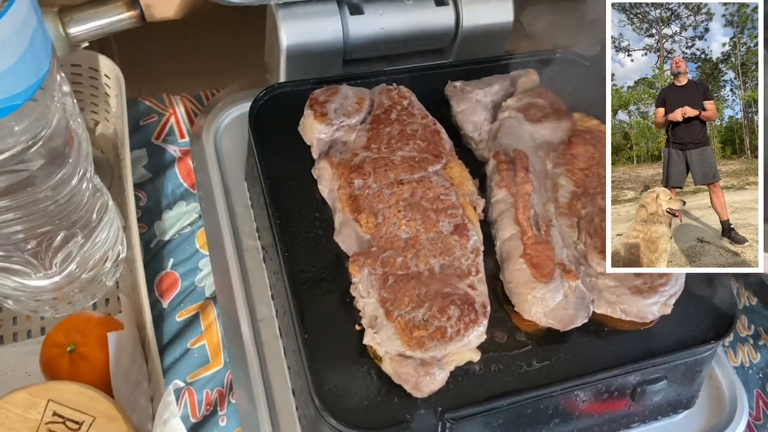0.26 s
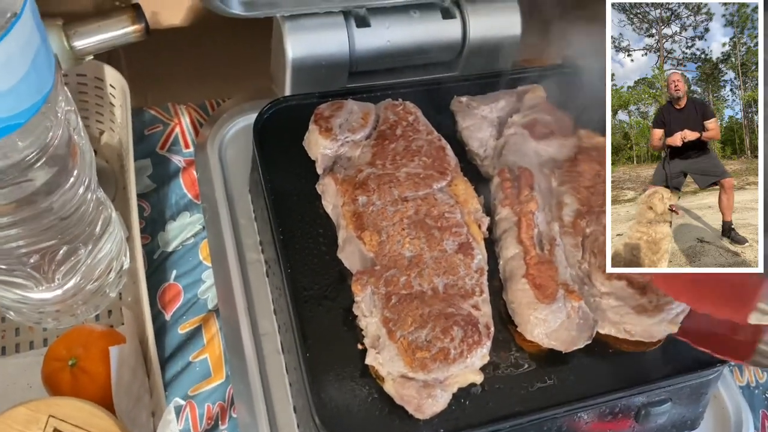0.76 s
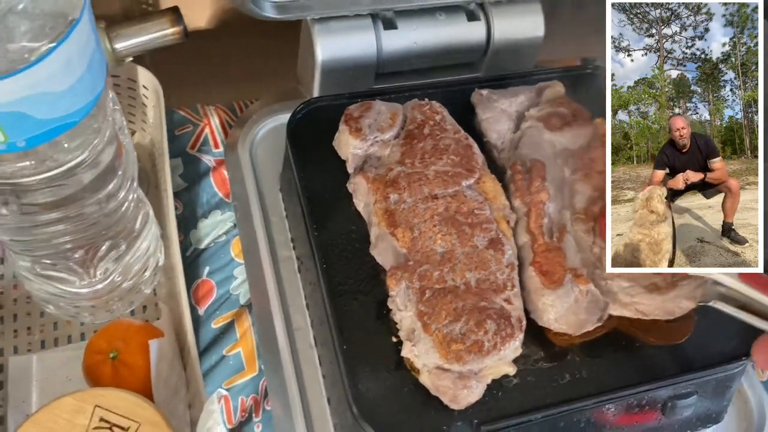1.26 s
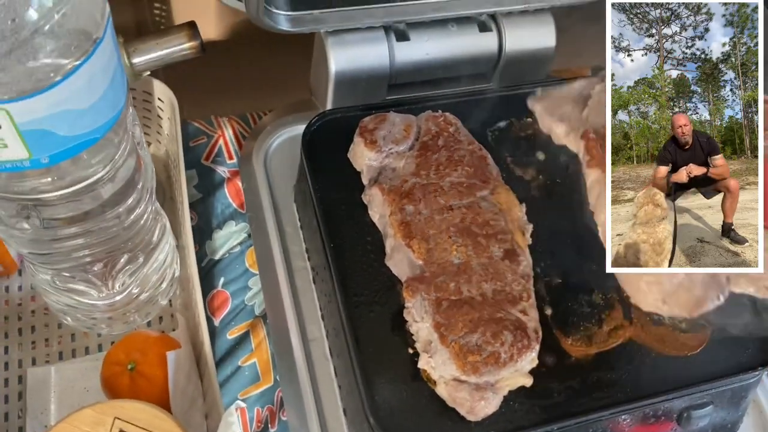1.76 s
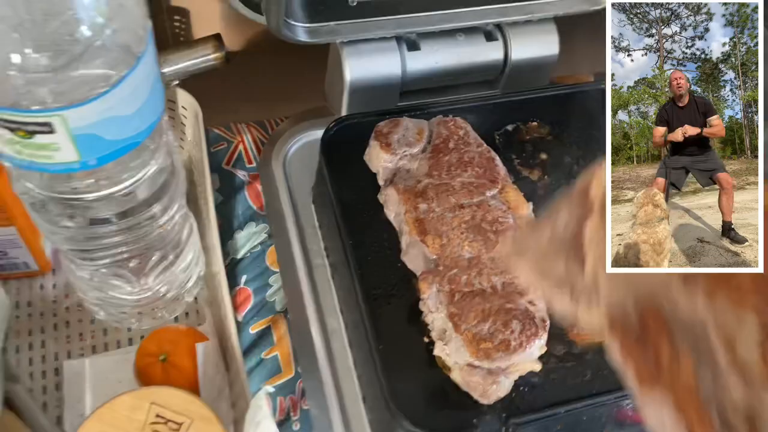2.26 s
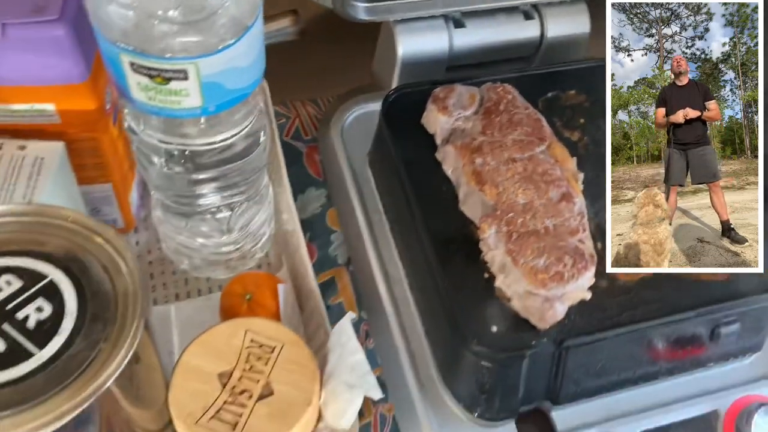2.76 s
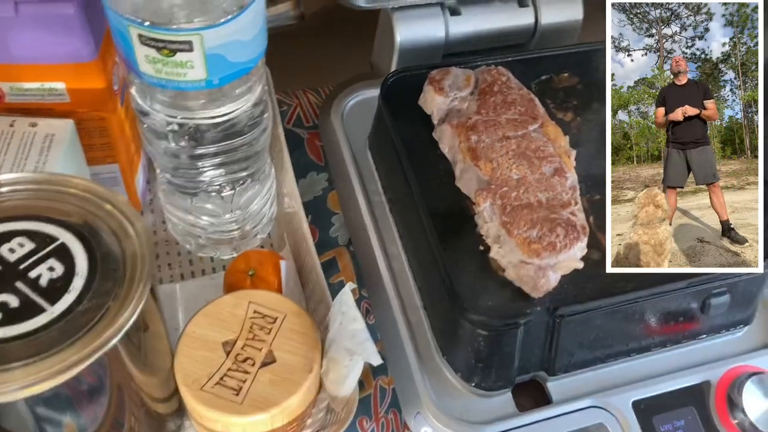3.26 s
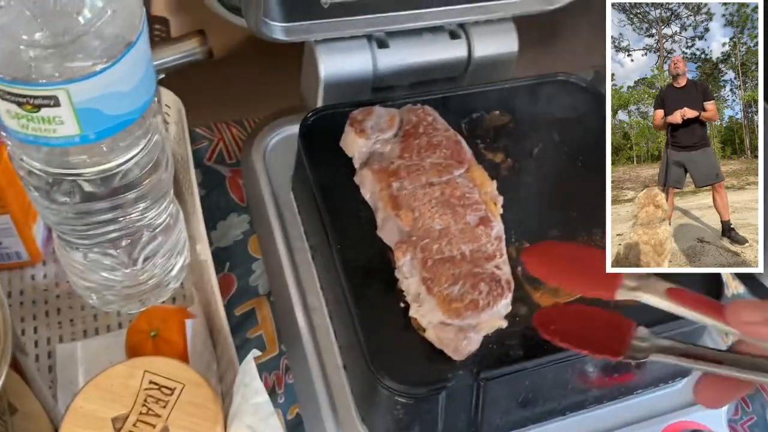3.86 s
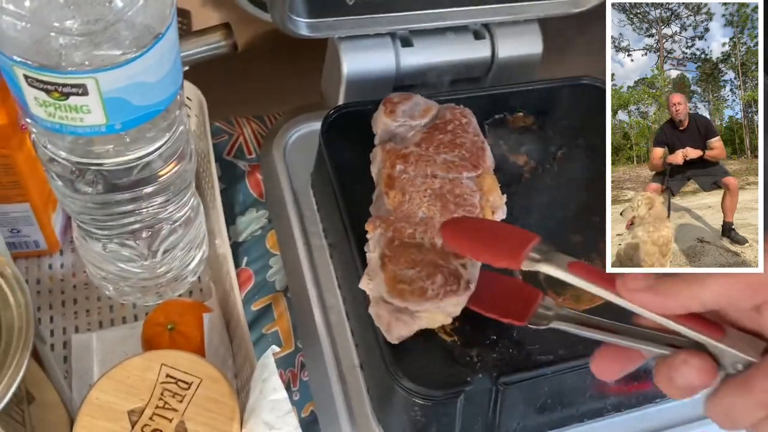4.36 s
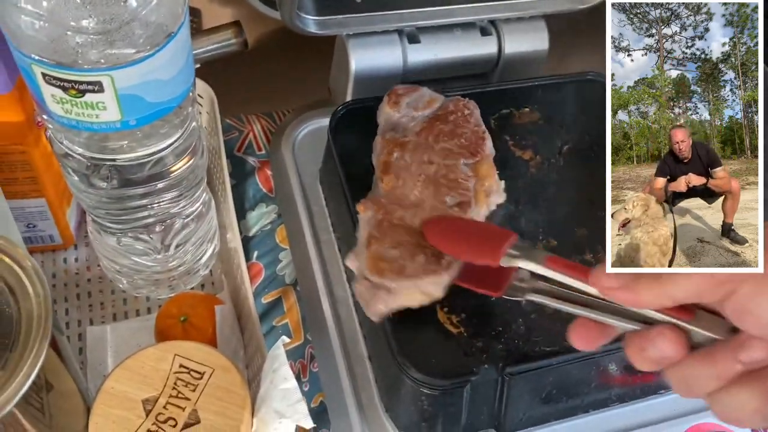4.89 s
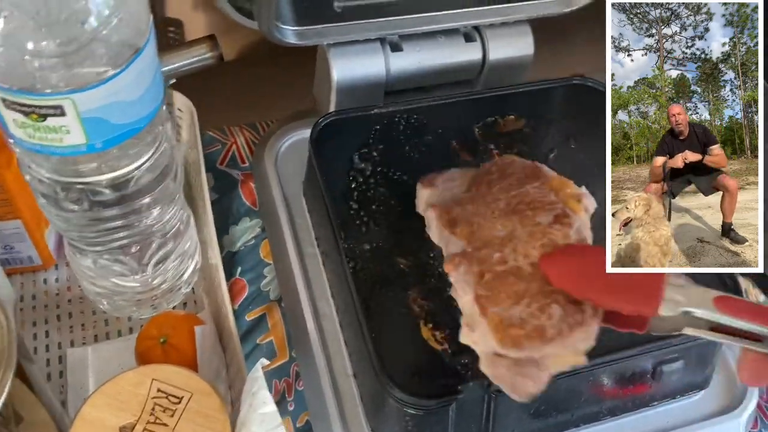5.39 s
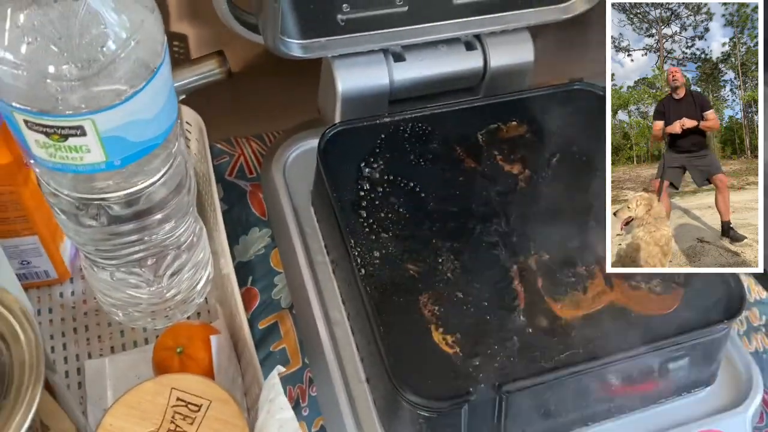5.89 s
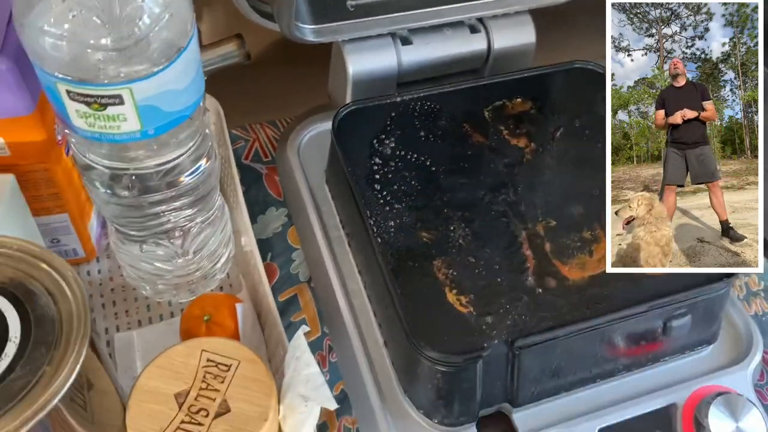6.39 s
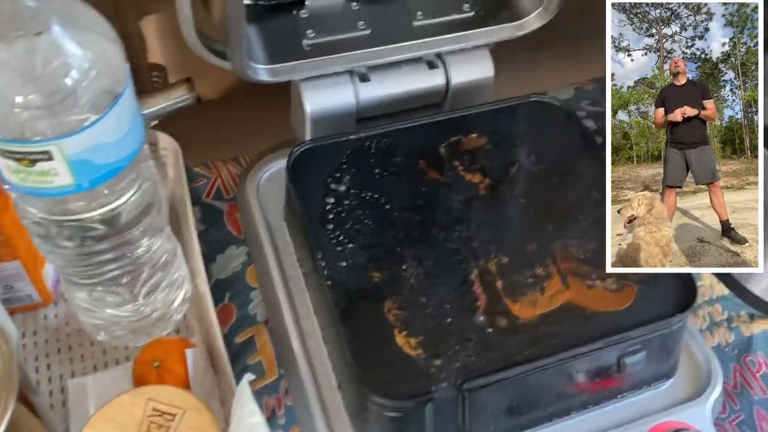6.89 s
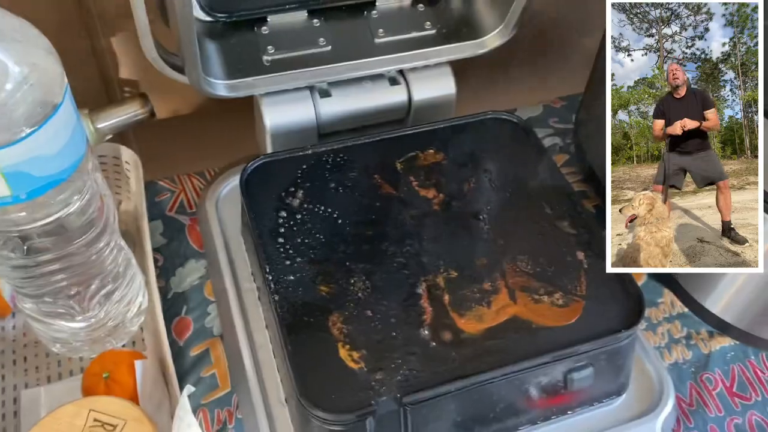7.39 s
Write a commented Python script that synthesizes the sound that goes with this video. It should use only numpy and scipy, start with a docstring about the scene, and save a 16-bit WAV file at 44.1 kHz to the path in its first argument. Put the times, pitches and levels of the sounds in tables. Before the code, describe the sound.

Steaks sizzle and spit close up on a hot grill plate, the hiss dying down to scattered pops as they are lifted off.

```python
"""Steaks on an electric grill

Two steaks sizzle close to a hand-held microphone and are lifted off with soft tongs. Countless tiny
steam bubbles burst, more when the meat is pressed or dragged; on the bare plate the last fat thins to
single spits and high squeaks. The lid and kitchen answer briefly, and an appliance hums underneath."""
import sys
import numpy as np
from scipy import signal
from scipy.fft import rfft, irfft, next_fast_len
from scipy.io import wavfile
from scipy.ndimage import map_coordinates

SR = 44100
rng = np.random.default_rng(int(sys.argv[2]) if len(sys.argv) > 2 else 0)


def dump(signal):
    """Clip the signal to [-1, 1] and save it as 16-bit WAV at the path in sys.argv[1]."""
    limited = np.clip(np.atleast_2d(signal).T, -1, 1)
    pcm = np.round(limited * 32767).astype(np.int16)
    wavfile.write(sys.argv[1], SR, pcm)


N = 336914


def amp(db):
    return 10 ** (np.asarray(db) / 20)


def unit(x):
    return x / np.sqrt(np.mean(x ** 2) + 1e-20)


def along(points, hz):
    """Read a curve of (freq_hz, value) points on a log frequency axis."""
    freqs, values = np.transpose(points)
    return np.interp(np.log(hz + 1), np.log(freqs + 1), values)


def wobble(rate):
    """A smooth random curve with `rate` knots a second."""
    return map_coordinates(rng.standard_normal(int(N * rate / SR) + 4), [np.arange(N) * rate / SR])


def filtered(x, response):
    """Pass x through a complex frequency response."""
    size = next_fast_len(N + SR // 2, real=True)
    return irfft(rfft(x, size) * response(np.fft.rfftfreq(size, 1 / SR)), size)[:N]


def noise(colour):
    """Noise of rms 1 with the given colour."""
    return unit(filtered(rng.standard_normal(N), lambda hz: amp(along(colour, hz))))


def snap(gain, size=2048):
    """The sharpest causal click that has the given gain over frequency."""
    cepstrum = irfft(np.log(np.maximum(gain(np.fft.rfftfreq(size, 1 / SR)), 1e-6)))
    cepstrum[1:size // 2] *= 2
    cepstrum[size // 2 + 1:] = 0
    return irfft(np.exp(rfft(cepstrum)))


def add(track, start_s, sound):
    """Mix a sound into a track."""
    start = int(np.clip(round(start_s * SR), 0, N))
    track[start:start + len(sound)] += sound[:N - start]


def bubble_bands(hz, edges_hz=(2100, 4600, 8000), order=16):
    """Crossover gains for big, middling, small and tiny bubbles, from low to high."""
    below = [0 * hz] + [1 / (1 + (hz / edge) ** order) for edge in edges_hz] + [0 * hz + 1]
    return np.abs(np.diff(below, axis=0))


ONE_STEAK_DB = -43  # the sizzle's reference level
# The undisturbed sizzle: two steaks, one from 1.5 s, then the bare plate drying: time_s, level_db
SIZZLE_ARC = [(0, -35.5), (.12, -36.5), (.55, -37), (.72, -37), (1.3, -36), (1.56, -42.5), (2.25, -43.6),
              (2.55, -42), (3.15, -43.5), (4, -44), (5.25, -44.5), (5.7, -51), (5.94, -55.5), (6.07, -52.5),
              (6.32, -59), (6.8, -59.5), (6.93, -66), (7.64, -65)]
# Boosts as the meat is pressed or dragged: start_s, length_s, wet_db, boil_db, spray_db
MEAT_PRESSES = [(0.818, 0.21, 5, 5, 3), (1.044, 0.22, 4.5, 4.5, 4.5), (1.57, 0.1, 4.5, .5, 3.8),
                (1.727, 0.38, 3, 0.5, 0.86), (4.115, 0.29, 3.5, 3.5, 3.5), (4.37, 0.13, 0.5, 4.8, 1.3),
                (4.52, .2, 1, 3.7, 0), (4.723, 0.31, 3, 5.5, 1.9), (5.047, 0.39, 1.5, 0, 0)]


def frying_effort(ramp_s=0.1):
    """Vigour in dB against one steak, and boosts as presses boil out juice and put fat on hot metal."""
    t, boosts_db = np.arange(N) / SR, np.zeros((3, N))
    for start_s, length_s, *gains_db in MEAT_PRESSES:
        force = np.clip((t - start_s) / ramp_s, 0, 1) - np.clip((t - start_s - length_s) / ramp_s, 0, 1)
        boosts_db += np.outer(gains_db, force)
    vigour_db = np.interp(t, *np.transpose(SIZZLE_ARC)) - ONE_STEAK_DB
    return vigour_db, *boosts_db


# Tone of fat bursting on the plate: freq_hz, gain_db
FAT_COLOUR = [(250, -39.5), (690, -26.5), (850, -13), (1250, -4), (2100, -2), (3400, 1), (4000, -2),
              (4500, -12.5), (4850, -14), (6400, -3), (8000, -15.5), (11000, -19), (12800, -27),
              (15800, -30)]
# Mix of big, middling, small and tiny bubbles: trim_db, follow (dB per dB of vigour)
BUBBLE_MIX = [(-9.5, 0.88), (-1.5, 1), (-4, 0.89), (-11.5, 0.77)]


def sizzle(clump_db=0.08, flutter_db=0.3, balance_db=1.5, drift_db=0.3, mist=0.71, mist_s=0.0025):
    """Unequal bubbles burst at random, in clumps; wet meat adds big ones, hot fat a fine spray."""
    vigour_db, wet_db, boil_db, spray_db = frying_effort()
    # a quieter sizzle has fewer bursts, of more unequal size
    bursts_per_s = np.minimum(600 + 9000 * amp(1.4 * (vigour_db + boil_db)), 14000)
    spread_db = 5 - 0.0166 * vigour_db
    chance = bursts_per_s / SR
    sizes = amp(spread_db * np.minimum(rng.standard_normal(N), 2.3)) * rng.choice([-1, 1], N)
    bursts = (rng.random(N) < chance) * sizes / np.sqrt(chance)
    # the last fat on the drying plate comes in bouts
    bouts_db = 0.076 * np.maximum(-vigour_db, 0)
    bursts *= amp(clump_db * wobble(110) + (flutter_db + bouts_db) * wobble(22))
    # each burst throws off a brief mist of finer droplets
    lingering = signal.lfilter([1], [1, -np.exp(-1 / (mist_s * SR))], bursts ** 2)
    droplets = unit(np.sqrt(lingering) * rng.standard_normal(N))
    fat_click = snap(lambda hz: amp(along(FAT_COLOUR, hz)))
    pressed_db = [wet_db, boil_db, spray_db, spray_db]
    out = np.zeros(N)
    for band, (trim_db, follow) in enumerate(BUBBLE_MIX):
        # each bubble has its own balance of low and high; the mist is mostly treble
        balance = amp(balance_db * rng.uniform(-0.81, 1, N) + drift_db * wobble(6.4))
        mist_share = mist * (band / (len(BUBBLE_MIX) - 1)) ** 2
        pulses = np.sqrt(1 - mist_share) * unit(bursts * balance) + np.sqrt(mist_share) * droplets
        crackle = signal.oaconvolve(pulses, fat_click)[:N]
        level_db = ONE_STEAK_DB + trim_db + follow * vigour_db + pressed_db[band]
        out += amp(level_db) * unit(filtered(crackle, lambda hz: bubble_bands(hz)[band]))
    return out


# The right-hand steak's slightly higher hiss: freq_hz, gain_db
STEAK_TINT = [(1900, 1), (2550, -1.7), (3200, .5), (4200, 2.5), (5300, -1.3), (8000, -1.5)]


def right_steak(x, clear_at_s=1.6, lift_s=0.3):
    """The right-hand steak tints the sizzle until it is lifted clear of the plate."""
    contact = np.clip((clear_at_s - np.arange(N) / SR) / lift_s, 0, 1)
    tinted = signal.oaconvolve(x, snap(lambda hz: amp(along(STEAK_TINT, hz))))[:N]
    return (1 - contact) * x + contact * tinted


def simmer(level_db=-65, follow=0.54):
    """Juice boiling under the meat gives a muffled rush that grows with the sizzle."""
    vigour_db, wet_db, _, _ = frying_effort()
    rush = noise([(100, -55), (200, -8.5), (300, -2.5), (460, 3.5), (650, -2.5), (1000, -25), (2500, -48)])
    return rush * amp(level_db + follow * (vigour_db + wet_db))


# Partials of the appliance hum: pitch_hz, level_db
HUM_PARTIALS = [(71, -83), (119.9, -73), (297.1, -73), (371.7, -83), (511.2, -76.5), (753.7, -76.5)]
# Room tone of the still kitchen: freq_hz, gain_db
AIR_COLOUR = [(30, 2.5), (48, 6.5), (85, -1.5), (170, -4.5), (235, -1.5), (450, -4.5), (650, -6.5),
              (800, -0.5), (1100, -7), (2000, -5.5), (3500, -11), (5000, -32), (7000, -33), (15000, -63)]


def kitchen(air_db=-60, waver_rad=0.2):
    """Still air and the slightly unsteady hum of an appliance."""
    t, hum = np.arange(N) / SR, np.zeros(N)
    for pitch_hz, level_db in HUM_PARTIALS:
        peak = np.sqrt(2) * amp(level_db + wobble(3.0))
        hum += peak * np.sin(2 * np.pi * pitch_hz * t + waver_rad * wobble(5.7))
    return hum + amp(air_db) * noise(AIR_COLOUR)


# Sub rumble of slow draughts: freq_hz, gain_db
DRAUGHT_COLOUR = [(1, -18), (4, 13), (9, 3), (15, -0.5), (22, -21), (32, -28), (60, -88), (150, -120)]
# Soft bumps of the hand: start_s, level_db
HAND_BUMPS = [(0.634, -53), (3.261, -57), (5.77, -55), (6.201, -60)]


def handling(draught_db=-42.5, thud_band_hz=(30, 150), t60_s=0.26, rise_s=0.0011):
    """Draughts sway the microphone slowly and the hand bumps it now and then."""
    out, t = amp(draught_db) * noise(DRAUGHT_COLOUR), np.arange(SR // 4) / SR
    body = signal.butter(2, thud_band_hz, "band", fs=SR, output="sos")
    envelope = amp(-60 * t / t60_s) * (1 - np.exp(-t / rise_s))
    for start_s, level_db in HAND_BUMPS:
        thud = unit(signal.sosfilt(body, rng.standard_normal(len(t))))
        add(out, start_s, amp(level_db) * thud * envelope)
    return out


# The loudest spits of fat, before the trims in spits(): start_s, level_db, crack_db, treble_db
LOUD_SPITS = [(0.0116, -17.5, -22, -53), (0.5092, -13.5, -20, -34), (1.4593, -20, -17, -37),
              (1.8168, -25, -5, -25), (2.2925, -24.5, -14, -33), (2.7845, -21, -17, -27),
              (5.3926, -27, -15, -26), (5.4786, -30.5, -9, -26), (5.6739, -33, -19, -17),
              (5.8724, -35, -5, -22), (6.012, -32.5, -16, -17), (6.0447, -30.5, -23, -17),
              (6.2075, -38, -18, -33), (6.4155, -33, -18, -20), (6.489, -37, -16, -13),
              (6.5112, -33.5, -18, -19), (6.6266, -38, -15, -17), (6.6506, -31.5, -15, -28),
              (6.664, -37, -24, -23), (6.751, -35, -20, -35), (7.0384, -37, -17, -14),
              (7.1646, -37, -23, -16), (7.22, -37, -10, -26), (7.5608, -31, -13, -21)]


def spits(trim_db=11, crack_trim_db=17, treble_trim_db=26.5, crack_t60_s=0.003, spray_t60_s=0.06):
    """A drop of fat bursts with one sharp crack and a short spray of droplets."""
    out, t = np.zeros(N), np.arange(SR // 30) / SR
    envelope = amp(-60 * t / crack_t60_s) + 0.15 * amp(-60 * t / spray_t60_s)
    envelope[0] += 2.1  # the instant of rupture
    for start_s, level_db, crack_db, treble_db in list(LOUD_SPITS) + stray_spits():
        def colour(hz):
            big, _, _, tiny = bubble_bands(hz, order=8)
            shelves_db = big * (crack_db + crack_trim_db) + tiny * (treble_db + treble_trim_db)
            return amp(along(FAT_COLOUR, hz) + shelves_db)
        burst = rng.choice([-1, 1], len(t)) * envelope
        pop = signal.fftconvolve(burst, snap(colour))
        add(out, start_s + 0.0006, amp(level_db + trim_db) * pop / np.linalg.norm(pop))
    return out


def stray_spits(per_s=13, base_db=-32.5, follow=0.5, scatter_db=2):
    """Rows for the lesser spits: random times, average colour, weaker as the plate dries."""
    timing, strength = rng.random((int(per_s * N / SR), 2)).T
    starts_s = timing * N / SR
    vigour_db = np.interp(starts_s, *np.transpose(SIZZLE_ARC)) - ONE_STEAK_DB
    levels_db = base_db + follow * vigour_db + scatter_db * (2 * strength - 1)
    colour_db = np.mean(LOUD_SPITS, axis=0)[2:]
    return [(start_s, level_db, *colour_db) for start_s, level_db in zip(starts_s, levels_db)]


# Steam squeezing out of tiny blisters: start_s, level_db, pitch_hz
STEAM_SQUEAKS = [(5.6331, -45, 11800), (5.6885, -38, 10400), (5.7473, -34.5, 9710), (6.0442, -44, 10400),
                 (6.5565, -41, 11400), (6.6308, -48, 11200), (6.8039, -42, 9760), (7.0434, -50, 11800),
                 (7.2399, -52, 12600), (7.3572, -46, 10900)]


def squeaks(trim_db=-2, width_hz=1950, t60_s=0.039, rise_s=0.0046):
    """Each blister vents a short, narrow, high hiss."""
    out, t = np.zeros(N), np.arange(SR // 10) / SR
    envelope = amp(-60 * t / t60_s) * (1 - np.exp(-t / rise_s))
    for start_s, level_db, pitch_hz in STEAM_SQUEAKS:
        ring = np.sin(2 * np.pi * pitch_hz * t) * t * np.exp(-np.pi * width_hz * t)
        hiss = unit(signal.fftconvolve(rng.standard_normal(len(t)), ring)[:len(t)])
        add(out, start_s, amp(level_db + trim_db) * hiss * envelope)
    return out


# Dull tone of the soft tongs: freq_hz, gain_db
TONG_COLOUR = [(120, -12), (350, 9), (800, -1), (1500, -2), (3500, -15), (6000, -30)]
# A quick double knock: start_s, peak_db
TONG_TAPS = [(6.447, -37), (6.469, -40)]


def tongs():
    """The soft tongs knock lightly as the steak is set down."""
    out, knock = np.zeros(N), snap(lambda hz: amp(along(TONG_COLOUR, hz)))
    for start_s, peak_db in TONG_TAPS:
        add(out, start_s, amp(peak_db) * knock / np.abs(knock).max())
    return out


# Narrow rings of the plate and its lid: pitch_hz, width_hz, gain_db
PLATE_RINGS = [(962, 17, 0), (1449, 23, -0.5), (2710, 67, -16), (3730, 17, -13)]
# Early reflections off the open lid, the counter and the back wall: delay_s, gain_db
REFLECTIONS = [(.0044, -20.5), (.0067, -16.5), (0.0114, -22.5)]


def surroundings(x, near_db=-9, near_t60_s=0.045, room_db=-12, room_t60_s=0.22, block=384):
    """The plate rings; lid, counter and kitchen scatter each spot's bursts along different paths."""
    def response(hz):
        rings = sum(amp(db) * 1j * hz * width / (pitch ** 2 - hz ** 2 + 1j * hz * width)
                    for pitch, width, db in PLATE_RINGS)
        walls = sum(amp(db) * np.exp(-2j * np.pi * hz * delay_s) for delay_s, db in REFLECTIONS)
        return (1 + rings) * (1 + walls)
    out, t = filtered(x, response), np.arange(SR // 8) / SR
    near = amp(-60 * t / near_t60_s) * (t > 0.0008)
    room = amp(-60 * t / room_t60_s) * (t > 0.006)
    decay = np.hypot(amp(near_db) * near / np.linalg.norm(near),
                     amp(room_db) * room / np.linalg.norm(room))
    # from moment to moment the bursts come from other spots, each with its own echoes
    moments = np.pad(out, (0, -N % block)).reshape(-1, block)
    tails = decay * rng.standard_normal((len(moments), len(t)))
    for k, echo in enumerate(signal.fftconvolve(moments, tails, axes=1)):
        add(out, k * block / SR, echo)
    return out / np.sqrt(1 + np.sum(decay ** 2))


def scene():
    """Everything reaches one microphone, alike in both channels."""
    grill = right_steak(sizzle()) + spits() + squeaks() + tongs()
    mono = surroundings(grill) + simmer() + handling() + kitchen()
    return np.array([mono, mono])


def record(dry, top_hz=15850):
    """A brick-wall low-pass takes off the very top."""
    return np.array([filtered(channel, lambda hz: hz < top_hz) for channel in dry])


dry = scene()
out = record(dry)
dump(out)
```